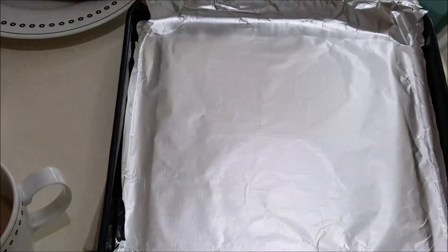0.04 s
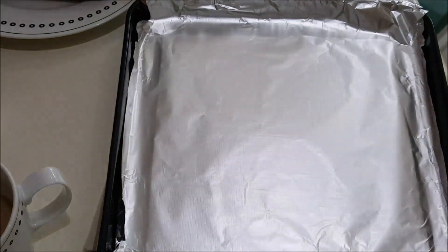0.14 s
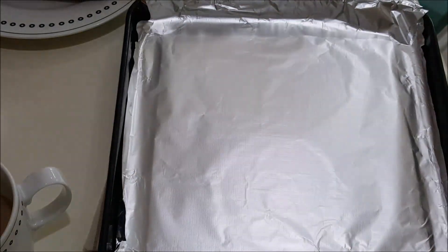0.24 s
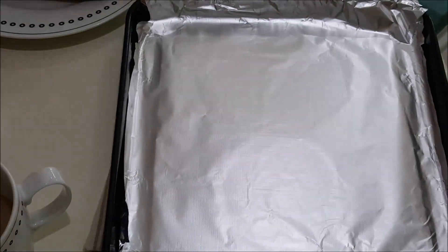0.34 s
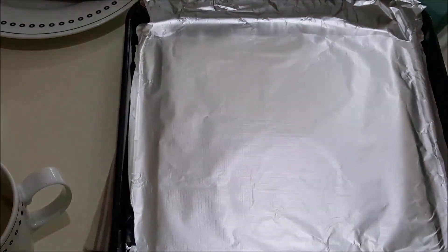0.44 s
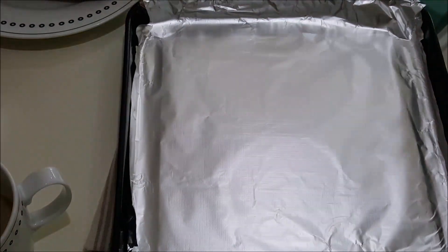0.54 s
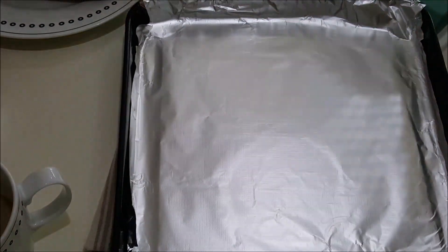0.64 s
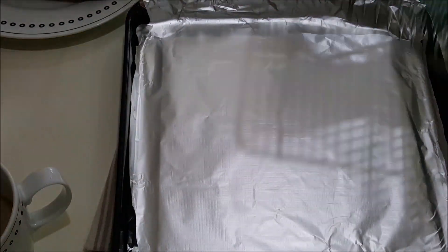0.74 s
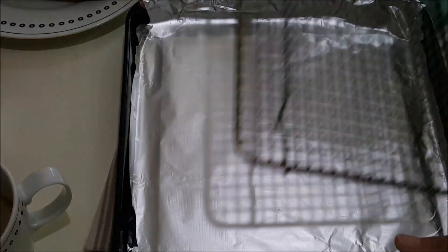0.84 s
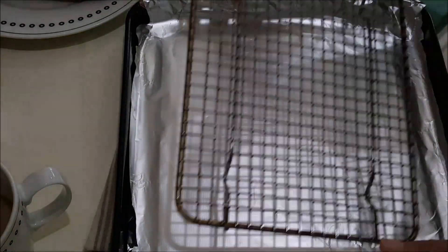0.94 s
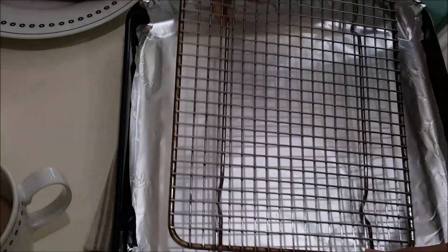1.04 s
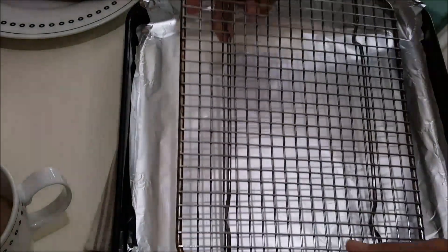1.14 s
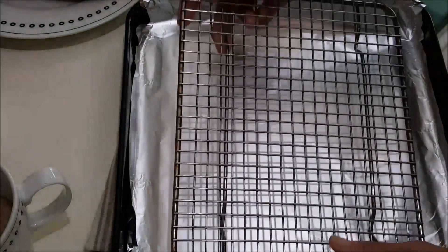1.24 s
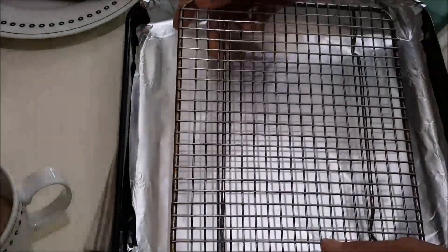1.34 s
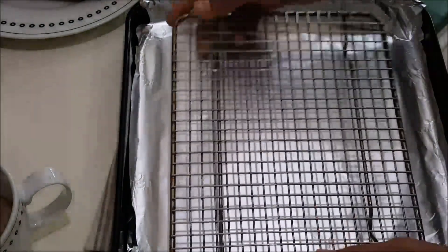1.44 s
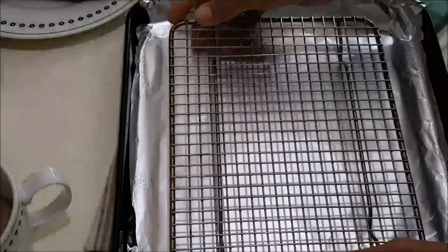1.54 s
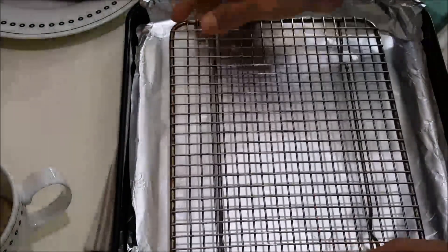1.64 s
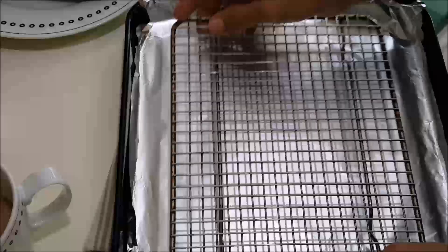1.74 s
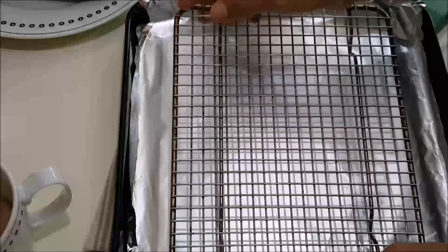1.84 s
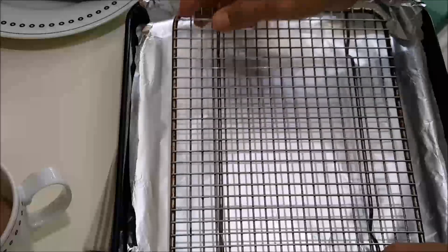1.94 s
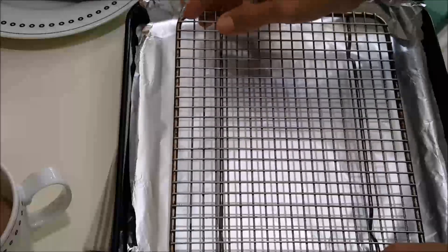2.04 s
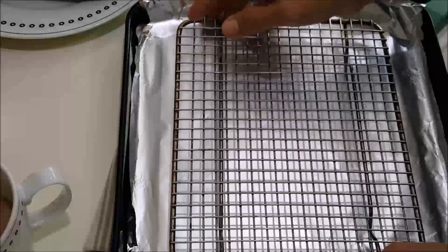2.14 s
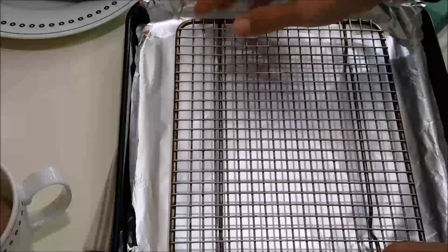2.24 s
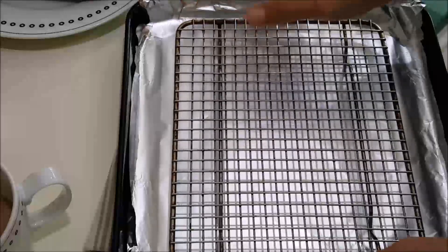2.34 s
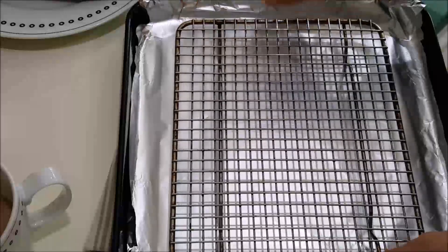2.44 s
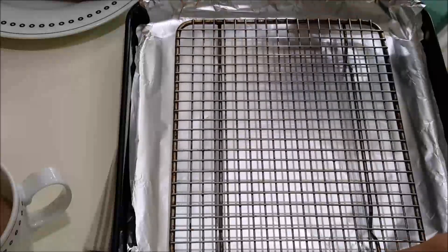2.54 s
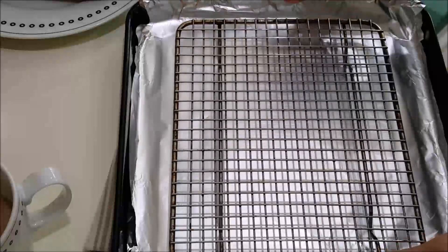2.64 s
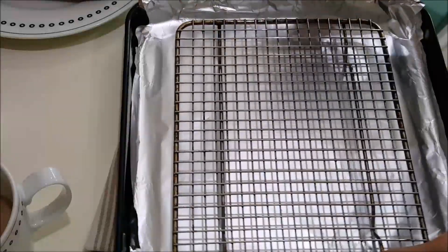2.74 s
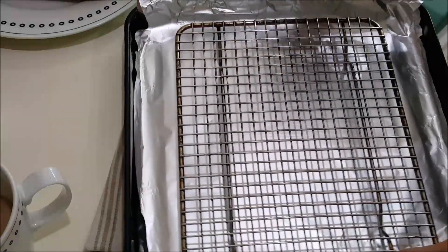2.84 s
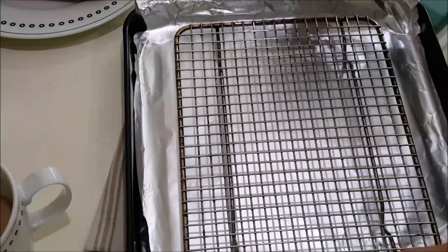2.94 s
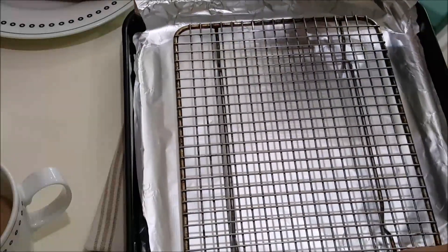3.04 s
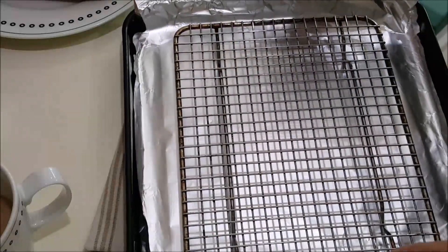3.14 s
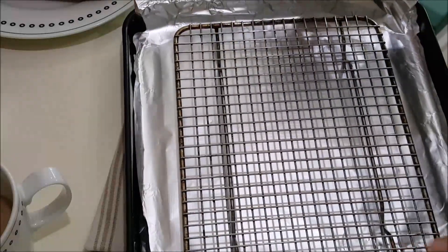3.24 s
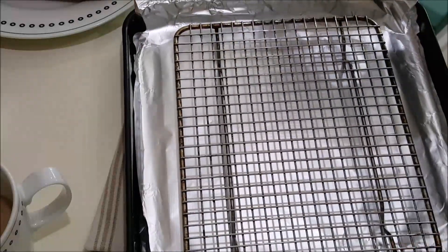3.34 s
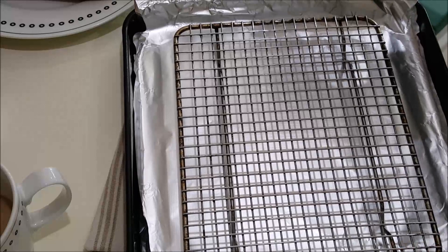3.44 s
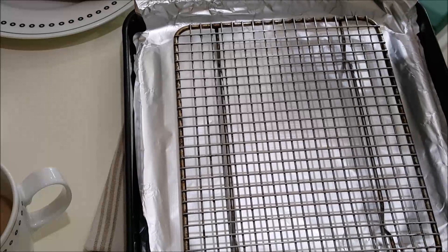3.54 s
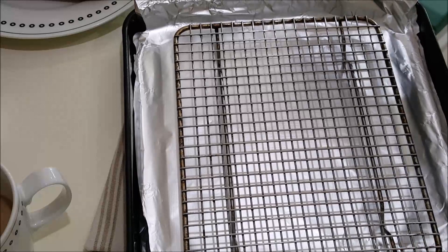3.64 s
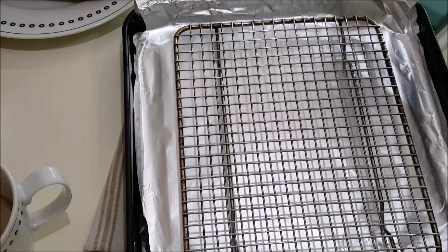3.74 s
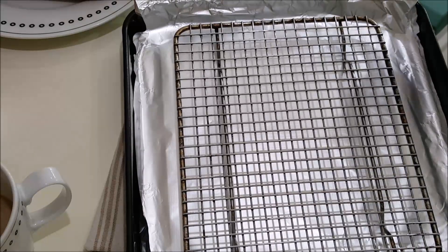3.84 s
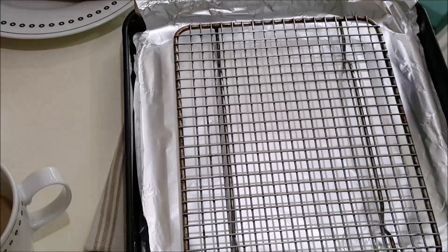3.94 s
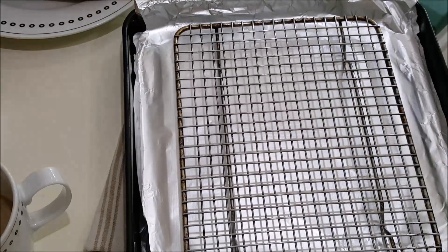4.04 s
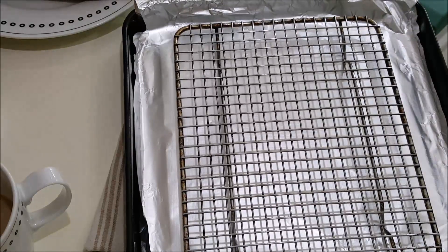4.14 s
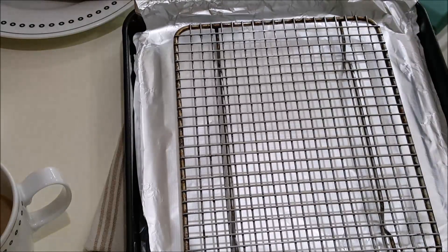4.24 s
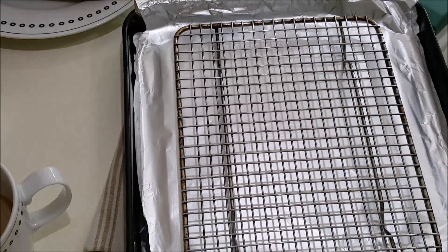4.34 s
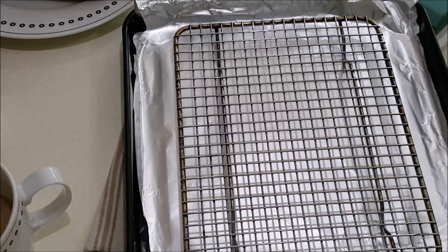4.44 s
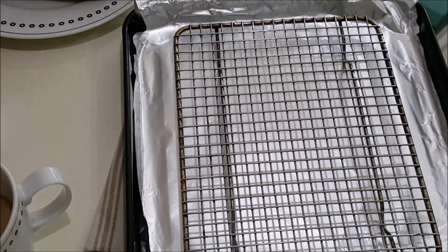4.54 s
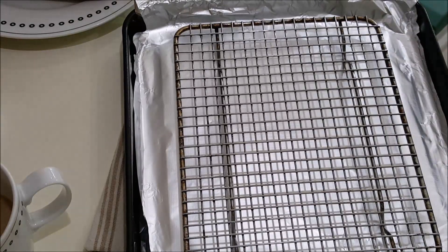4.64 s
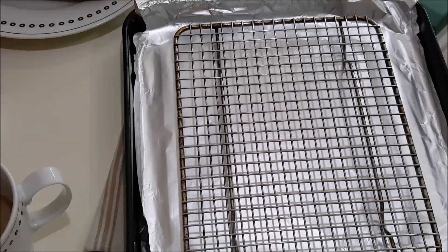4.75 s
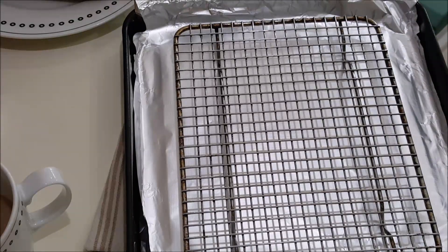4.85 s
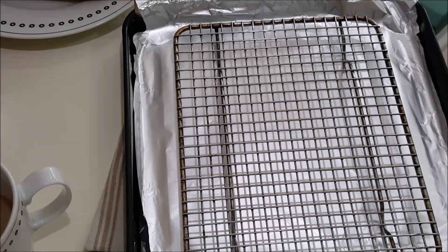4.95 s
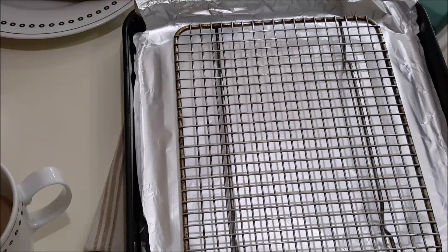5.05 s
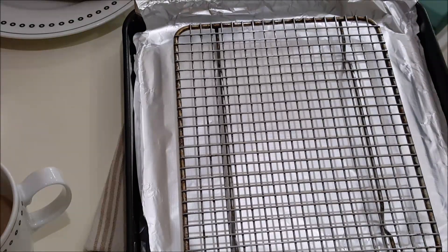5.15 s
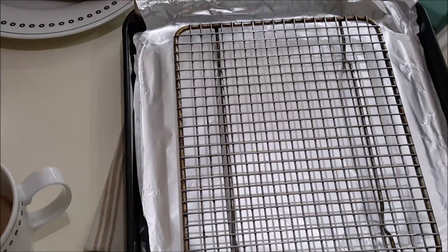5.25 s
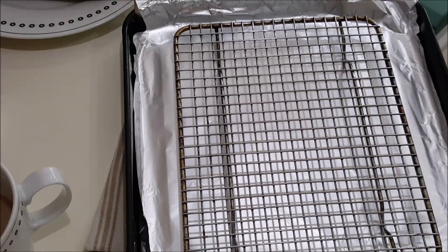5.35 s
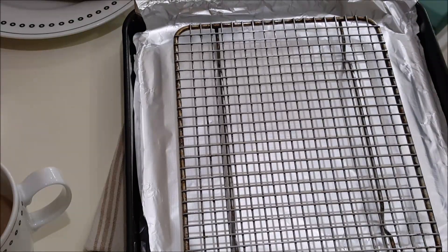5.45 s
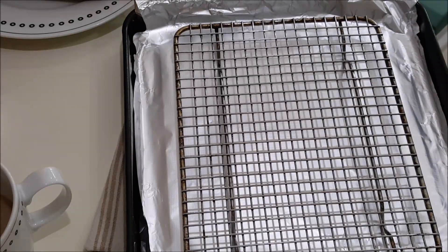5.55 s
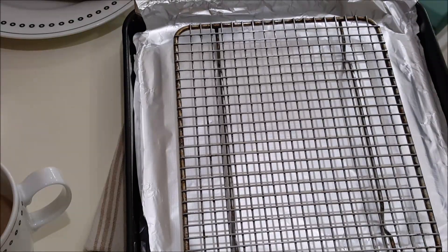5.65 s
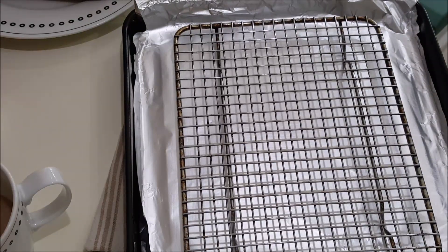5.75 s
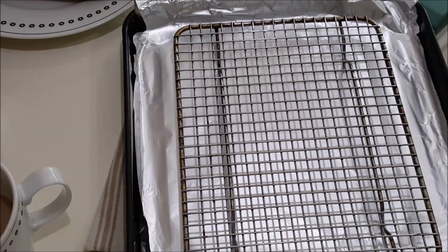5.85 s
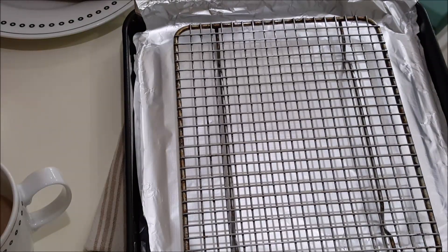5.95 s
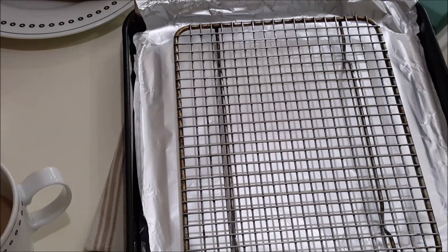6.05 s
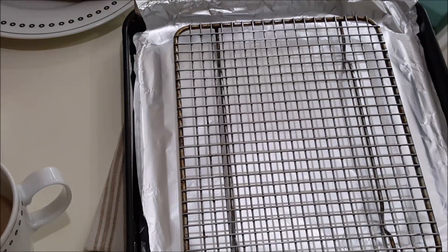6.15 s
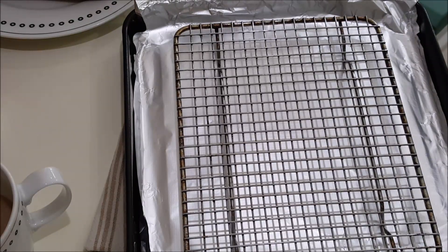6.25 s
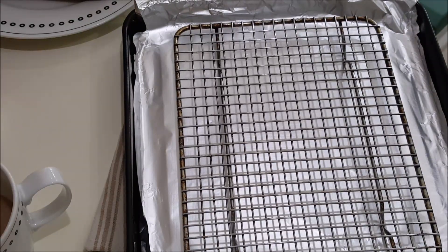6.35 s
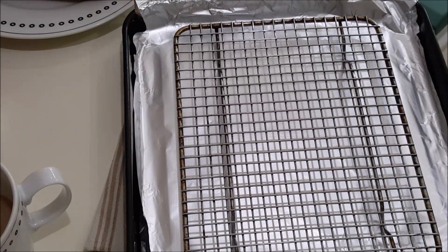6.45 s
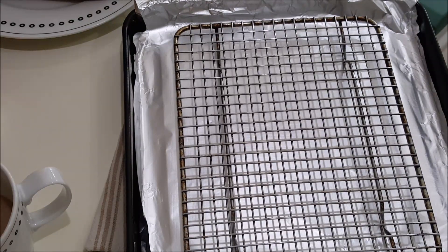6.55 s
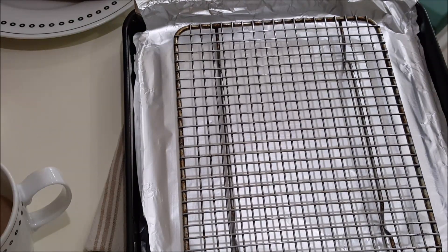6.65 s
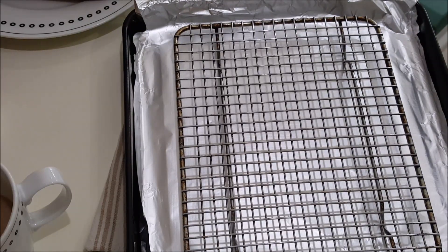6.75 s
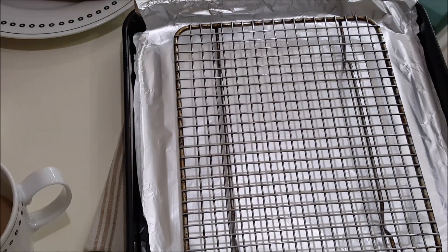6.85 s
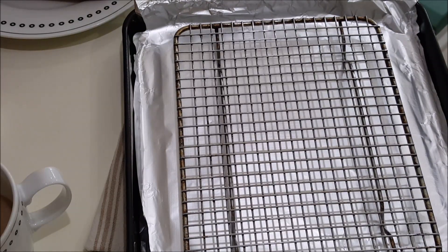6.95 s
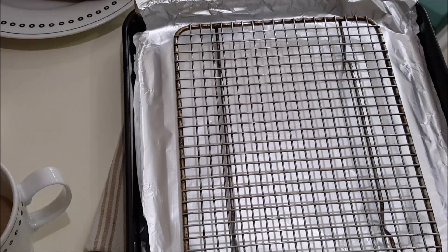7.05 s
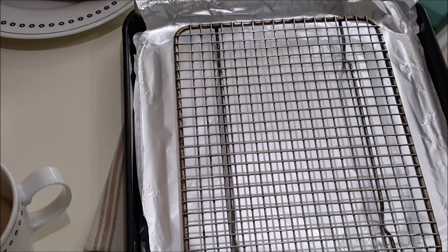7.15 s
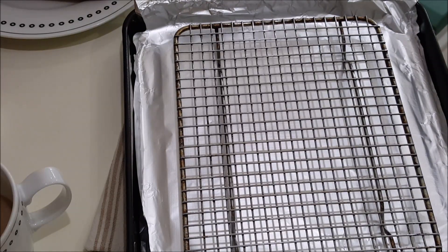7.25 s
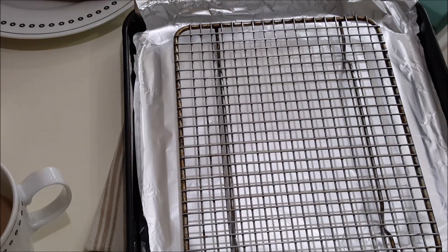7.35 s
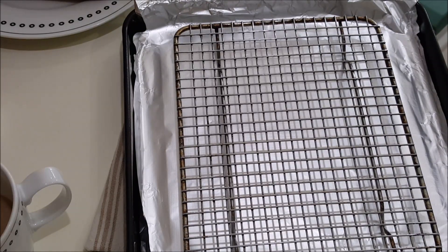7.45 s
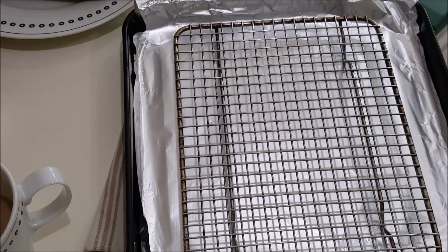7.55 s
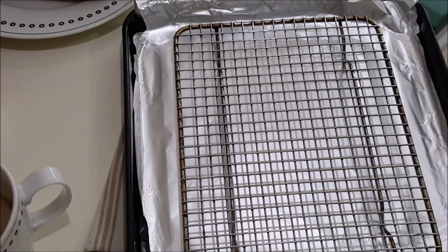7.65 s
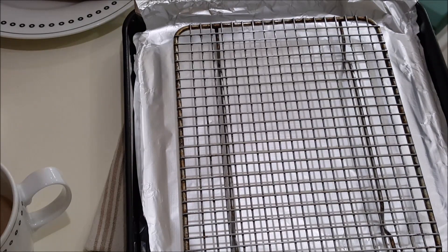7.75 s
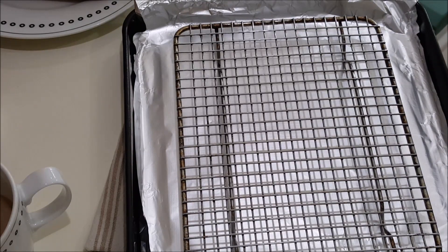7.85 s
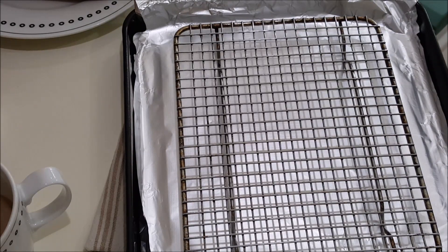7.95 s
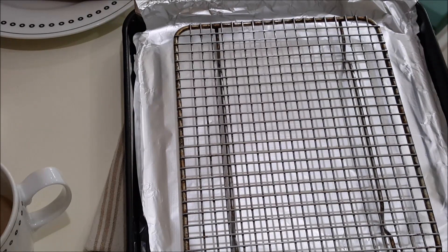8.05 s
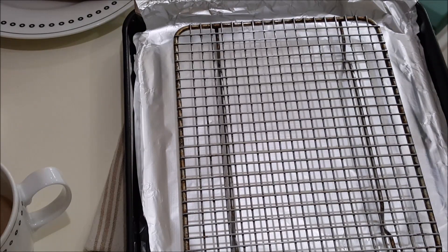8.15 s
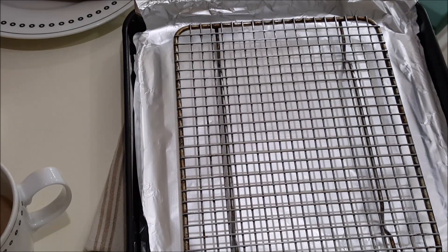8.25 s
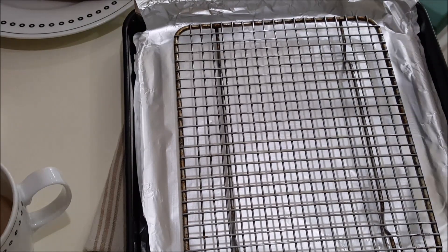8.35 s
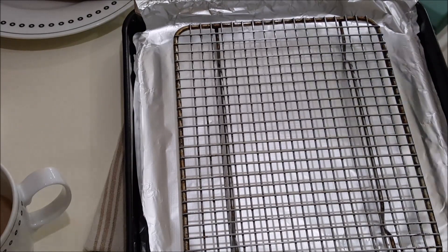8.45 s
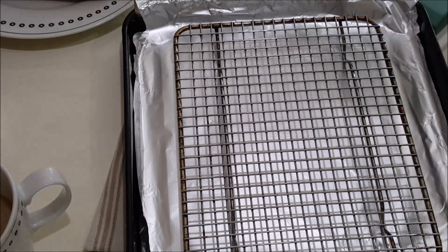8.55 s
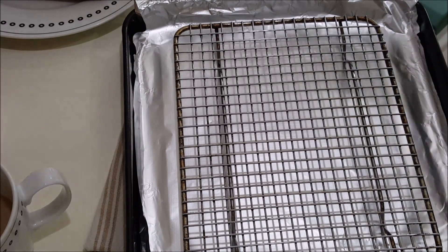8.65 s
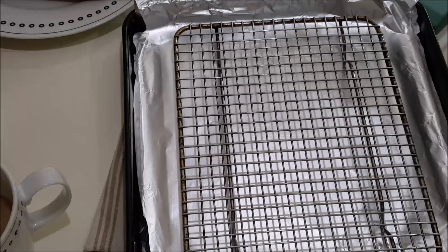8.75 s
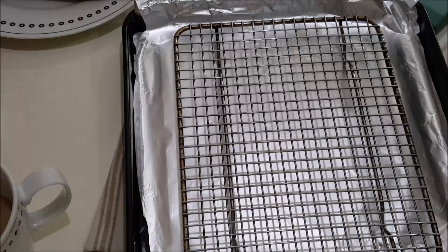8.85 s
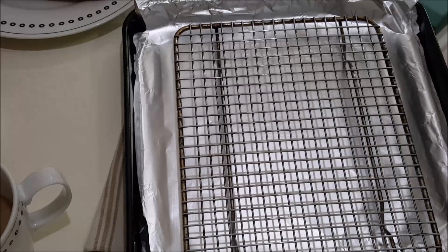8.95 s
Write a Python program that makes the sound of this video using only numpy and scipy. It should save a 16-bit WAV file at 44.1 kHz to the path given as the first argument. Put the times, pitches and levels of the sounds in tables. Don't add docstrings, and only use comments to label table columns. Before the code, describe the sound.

A small kitchen with hard, short-echoing walls and a faint low fridge hum, heard through a stereo phone near the tray. From 0 to 1 s hands stroke foil: light rustles, crisp ticks and a faint fading tray ring. At 1.07 s a wire rack's edge lands with a bright clank and foil crack; a stronger clank comes at 1.47, a ringing corner at 2.2, a soft nudge at 2.34. Foil crinkles crisply around 3.2, with dull small taps at 3.5 and a soft brush near 4.1. From 4.7 a drawer off to the side rolls open with a breathy squeak, bumpy boom and small chinks, fading by 6. Between 6.4 and 7.1 contents slide, utensils clink, and a lid knocks at 6.6. It rolls back from 7.4; a sharp loud latch snap at 7.82 leaves a thin ring, then wooden thuds at 8.33 and small brushes near 8.9.

```python
import sys
import numpy as np
from scipy import signal
from scipy.fft import rfft, irfft
from scipy.io import wavfile
from scipy.ndimage import uniform_filter1d

SR = 44100
rng = np.random.default_rng(int(sys.argv[2]) if len(sys.argv) > 2 else 0)


def put_to_file(sound):
    columns = np.atleast_2d(sound).T
    safe = np.clip(columns, -1, 1)
    whole_steps = np.round(safe * 32767)
    wavfile.write(sys.argv[1], SR, whole_steps.astype(np.int16))


def amplitude_ratio(level_db):
    exponent = np.asarray(level_db, float) / 20
    return 10 ** exponent


N = 396900

# (f/Hz, level/dB per Hz)
RUB = [(530, -15), (900, -8.5), (1040, -9), (1200, -3.5), (1410, -6.5), (2290, 1), (3070, -0.5),
       (7000, -15.5), (9100, -26), (15400, -120)]
# (f/Hz, level/dB per Hz)
HISS = [(2650, -34), (4500, -1.5), (6220, -1.5), (8690, 2.5), (9660, -8), (10800, -10), (12700, -7.5),
        (14800, -12), (16000, -7)]
# (full strength at t/s, hold/s, middle level/dB, treble level/dB)
STROKES = [(0.0, 0.001, -55, -60.5), (.075, 0.046, -64.5, -63.5), (.146, .001, -57, -56.5),
           (.375, .01, -64, -60.5), (.586, 0.059, -70, -66.5), (.828, .001, -49, -62.5),
           (1.12, 0.024, -53, -58), (1.22, 0.051, -61, -65), (1.43, .001, -70, -74),
           (1.56, 0.074, -67, -64.5), (1.69, 0.064, -70.5, -68), (1.79, 0.019, -64, -61.5),
           (2.19, 0.067, -65, -64), (2.38, 0.17, -62.5, -58.5), (2.56, 0.014, -67.5, -64.5),
           (2.72, .001, -71, -66.5), (2.775, .001, -73, -66.5), (2.84, 0.28, -81, -74),
           (3.01, 0.0011, -61.5, -63), (3.157, 0.004, -60.5, -51.5), (3.188, 0.011, -55, -48.5),
           (3.232, 0.0087, -60, -50.5), (3.268, .006, -69, -56.5), (3.305, 0.007, -75, -66.5),
           (3.375, 0.04, -57.5, -72), (3.45, .04, -61, -72), (3.58, .001, -65, -76), (3.842, .02, -69, -87),
           (3.896, .01, -61, -76), (3.96, 0.088, -70, -76.5), (4.122, .001, -50.5, -67),
           (4.138, 0.002, -49.5, -65.5), (4.37, .001, -64, -75)]
STROKE_RISE_DB_S, STROKE_FADE_DB_S = 866, (203, 157)
# (t/s, peak level/dB, chatter/s)
SNAP = [
    (7.8207, -17, 0.0021),
]


def colour(x, table):
    hz, db = np.transpose(table)
    bins_hz = np.arange(2049) * SR / 4096
    log_gain = np.interp(np.log(bins_hz + 1), np.log(hz), db) * np.log(10) / 20
    ceps = irfft(log_gain)
    ceps[1:2048] *= 2
    ceps[2049:] = 0
    taps = irfft(np.exp(rfft(ceps)))
    taps /= np.sqrt(np.sum(taps ** 2))
    taps = taps.reshape((1,) * (x.ndim - 1) + (-1,))
    return signal.oaconvolve(x, taps, axes=-1)[..., :x.shape[-1]]


def ring(x, modes, longest=0.33):
    out = np.zeros(len(x))
    heard = np.flatnonzero(np.abs(x) > 1e-6)
    span = slice(heard[0], heard[-1] + int(2 * longest * SR))
    for k, (hz, db, t60) in enumerate(modes):
        r = np.exp(-np.log(1000) / (min(t60, longest) * SR))
        w = 2 * np.pi * hz / SR
        mode = signal.lfilter([np.sin(w)], [1, -2 * r * np.cos(w), r * r], x[span])
        out[span] += (-1) ** k * amplitude_ratio(db) * mode
    return out


def body(x, peaks):
    probe = np.zeros(SR // 2)
    probe[0] = 1
    modes = [(hz, db + 20 * np.log10(width), np.log(1000) / np.pi / width) for hz, width, db in peaks]
    return ring(x, modes) / np.sqrt(np.sum(ring(probe, modes) ** 2))


def buzz(x, depth):
    flutter = uniform_filter1d(rng.standard_normal(N), SR // 150) * np.sqrt(SR / 150)
    return x * (1 + depth * flutter)


def grains(scatter_db, patchy_db=2.0):
    patch = uniform_filter1d(rng.standard_normal(N), SR // 70) * np.sqrt(SR / 70)
    size = np.minimum(rng.exponential(size=N), 5)
    x = rng.standard_normal(N) * amplitude_ratio(scatter_db * size + patchy_db * patch)
    return x / np.sqrt(np.mean(x ** 2))


def bursts(times, dbs, lengths):
    out, t = np.zeros(N + SR), np.arange(SR // 5) / SR
    for s, db, length in zip(times, dbs, lengths):
        start = int(s * SR)
        out[start:start + len(t)] += amplitude_ratio(db) * np.exp(-t / max(length, 1e-4))
    return out[:N]


def strikes(times, dbs, lengths, head):
    first = np.zeros(N)
    where = (np.asarray(times) * SR).astype(int)
    first[where] = amplitude_ratio(dbs) * head * np.sqrt(np.asarray(lengths) * SR / 2)
    return first + bursts(times, dbs, lengths) * np.sign(rng.standard_normal(N))


def pushes(rows):
    s, db, push = np.transpose(rows)
    push = np.maximum(push, 1e-4)
    return bursts(s, db - 20 * np.log10(push * SR), push)


def curve(rows):
    s, *cols = np.transpose(rows)
    return [amplitude_ratio(np.interp(np.arange(N) / SR, s, c, -140, -140)) for c in cols]


def swells(rows, rise_db_s, fade_db_s):
    t = np.arange(0, N / SR, .001)
    s, hold, *dbs = np.transpose(rows)[:, :, None]
    early, late = np.maximum(s - t, 0), np.maximum(t - s - hold, 0)
    gains = []
    for db, fade in zip(dbs, fade_db_s):
        strongest = np.max(db - rise_db_s * early - fade * late, axis=0)
        gains.append(amplitude_ratio(np.interp(np.arange(N) / SR, t, strongest)))
    return gains


def ports(mid, side):
    treble = signal.butter(1, 646, "high", fs=SR, output="sos")
    mid = mid - 0.18 * signal.sosfilt(treble, mid)
    side = 0.81 * signal.sosfilt(treble, side)
    return np.array([mid + side, mid - side])


def room(x, wet_db, pan_db, lag):
    # (f/Hz, t60/s, level/dB)
    walls = [(100, 0.37, 9.5), (230, 0.56, -7), (585, 0.61, 0.8), (1950, 0.57, -1.3), (5900, 0.42, -0.5),
             (14100, 0.4, -1.5)]
    wall_hz, wall_t60, wall_db = np.transpose(walls)
    t = np.arange(SR // 2) / SR
    tail = np.zeros((2, 2, len(t)))
    for hz in 90 * 2. ** np.arange(8):
        octave = signal.butter(2, [hz / np.sqrt(2), hz * np.sqrt(2)], "band", fs=SR, output="sos")
        t60 = np.interp(np.log(hz), np.log(wall_hz), wall_t60)
        db = np.interp(np.log(hz), np.log(wall_hz), wall_db)
        tail += signal.sosfilt(octave, rng.standard_normal(tail.shape)) * amplitude_ratio(db - 60 * t / t60)
    tail = signal.sosfilt(signal.butter(2, 250, "high", fs=SR, output="sos"), tail)
    tail *= (1 - np.exp(-t / 0.00011)) * (1 + 3.35 * np.exp(-t / 0.0043))
    tail = ports(*tail)
    tail *= amplitude_ratio(wet_db) / np.sqrt(np.sum(tail ** 2) / 2 / 2)
    wander_per_s = 2.7
    place = 2 * np.pi * wander_per_s * np.arange(N) / SR
    placed = x * np.array([[np.cos(place), np.sin(place)]])
    wet = signal.oaconvolve(placed, tail, axes=2)[..., :N].sum(axis=1)
    straight = [np.roll(x, lag), x]
    return (wet + straight) * amplitude_ratio(np.array([[pan_db], [-pan_db]]) / 2)


def kitchen():
    # (f/Hz, level/dB)
    lines = [(80.7, -63.5), (123.8, -87), (253.0, -81), (446.8, -75.5), (899.0, -90)]
    # (f/Hz, level/dB per Hz)
    air_tone = [(15, -19), (25, -22.5), (40, -16), (62, -31), (105, -5.5), (161, -14.5), (326, -11),
                (384, -14), (451, -11), (700, -17.5), (962, -24), (2280, -27.5), (8360, -41), (10400, -45),
                (16000, -42.5)]
    t = np.arange(N) / SR
    hum = 0
    for hz, db in lines:
        sway = uniform_filter1d(rng.standard_normal((2, N)), SR // 6, axis=1) * np.sqrt(SR / 6)
        cycles = hz * t + 2.2 * np.cumsum(sway[1]) / SR
        hum = hum + np.sqrt(2) * amplitude_ratio(db + .9 * sway[0]) * np.sin(2 * np.pi * cycles)
    air = ports(*colour(rng.standard_normal((2, N)), air_tone))
    air[0] = np.roll(air[0], shift=4)
    rumble = colour(rng.standard_normal((2, N)), [(15, 2), (35, -3), (70, -25), (16000, -120)])
    air += amplitude_ratio(-13.5) * rumble
    return (hum + amplitude_ratio(-65) * air) * amplitude_ratio(np.array([[.45], [-.45]]))


def tray():
    # (f/Hz, level/dB, t60/s)
    modes = [(138.6, -9, 0.56), (518, -7.5, 0.29), (660, -11, 0.48), (812, -11, 0.68), (1197, -5, 0.47),
             (1635, -10.5, 0.55), (2000, -5, 0.23)]
    knock = bursts([0], [-59], [0])
    return sum(buzz(ring(knock, [mode], 0.75), 1.0) for mode in modes)


def foil():
    # (full strength at t/s, hold/s, middle level/dB, treble level/dB)
    brushes = [(4.73, 0.15, -79, -62.5), (4.87, 0.0059, -55, -56), (4.96, .001, -54.5, -61),
               (5.05, 0.36, -70.5, -80.5), (5.34, 0.078, -63.5, -75), (5.45, .001, -80, -61),
               (5.53, .001, -57.5, -77), (5.86, .001, -69.5, -73), (6.4, .08, -73, -86),
               (6.495, 0.16, -57.5, -66), (6.61, 0.016, -52, -54.5), (6.786, 0.047, -61.5, -69.5),
               (6.93, 0.0089, -53, -62), (7.012, 0.0013, -56, -56.5), (7.196, 0.00089, -70.5, -75),
               (7.39, 0.61, -71.5, -79.5), (7.815, 0.12, -56.5, -54.5), (8.03, 0.12, -67.5, -68),
               (8.198, .001, -56.5, -60), (8.334, .001, -42, -50.5), (8.53, 0.015, -50.5, -61.5),
               (8.625, 0.0082, -51.5, -68), (8.78, 0.17, -73, -90), (8.95, .06, -58.5, -61)]
    stroked = swells(STROKES, STROKE_RISE_DB_S, STROKE_FADE_DB_S)
    brushed = swells(brushes, 893, (163, 179))
    rub, hiss = np.add(stroked, brushed)
    return amplitude_ratio(-3.5) * (colour(rub * grains(2.5), RUB) + colour(hiss * grains(4.4), HISS))


def crackle():
    per_s, level_db, decay_s = 69, -7.5, 0.00066
    rub, hiss = swells(STROKES, STROKE_RISE_DB_S, STROKE_FADE_DB_S)
    when, size = rng.random(N), rng.exponential(size=N)
    snaps = (when < per_s / SR) * amplitude_ratio(level_db + 4.5 * np.minimum(size, 3))
    snaps = signal.lfilter([1], [1, -np.exp(-1 / (decay_s * SR))], snaps) * rng.standard_normal(N)
    return colour(rub * snaps, RUB) + colour(hiss * snaps, HISS)


def ticks():
    # (t/s, treble peak/dB, middle peak/dB)
    creases = [(0.0324, -52.5, -72), (0.1363, -40, -57), (0.171, -50.5, -62), (0.244, -53.5, -61),
               (0.337, -53, -59), (0.3638, -45, -53), (0.386, -56, -59), (0.403, -59.5, -72),
               (0.494, -63, -80), (0.522, -62.5, -88), (0.586, -52.5, -62), (0.594, -65, -59),
               (1.3008, -53, -67), (1.4265, -52.5, -53), (1.5419, -47, -60), (1.6733, -54.5, -63),
               (1.778, -56, -66), (1.837, -43.5, -54.5), (2.3062, -49, -72), (2.1973, -46, -63),
               (2.768, -55, -55), (2.784, -50, -60), (2.908, -59, -69), (2.9583, -76, -78),
               (4.1165, -67, -65), (3.532, -59, -70), (3.5448, -57, -68)]
    # (t/s, treble peak/dB, middle peak/dB)
    cracks = [(1.072, -34.5, -31.5), (1.0851, -44, -49), (1.4724, -46, -38), (2.2027, -46.5, -48),
              (2.3416, -57, -73), (3.003, -69, -65), (3.532, -72, -66), (3.5445, -72, -67)]
    # (t/s, treble peak/dB, middle peak/dB)
    clicks = [(4.845, -62, -58), (4.8759, -66, -58), (4.9528, -70, -56), (5.3079, -77, -63),
              (5.378, -68, -70), (5.44, -53, -62), (5.5296, -81, -69), (5.623, -70, -80), (5.763, -75, -72),
              (5.822, -68, -64), (5.847, -69, -63), (6.4902, -63, -51), (6.601, -46, -55), (6.78, -62, -68),
              (6.8197, -63.5, -61), (6.8778, -76, -52.5), (6.91, -64, -50.5), (7.0103, -53.5, -55),
              (7.051, -62, -71), (8.182, -67, -59.5), (8.3195, -61, -58), (8.3255, -57, -52),
              (8.3318, -57, -44), (8.345, -62, -43), (8.5267, -65, -56), (8.6187, -70, -54),
              (8.937, -60.5, -59)]
    # (t/s, treble peak/dB, middle peak/dB)
    folds = [(0.096, -55.5, -63), (.625, -55, -61), (0.636, -54, -60), (.81, -70, -57), (.823, -71, -58),
             (2.392, -55, -61), (2.397, -52, -65), (2.471, -52.5, -59.5), (2.48, -58, -73),
             (2.6835, -65, -65.5), (3.1318, -68, -82), (3.1534, -47.5, -74), (3.157, -47, -71),
             (3.186, -46.5, -59), (3.3762, -70, -65), (3.36, -75, -65), (3.8411, -84, -70),
             (3.893, -78, -65), (3.902, -81, -65), (4.134, -66, -50), (4.364, -80, -66)]
    s, high_db, mid_db = np.transpose(creases + cracks + clicks + folds)
    counts = [len(creases), len(cracks), len(clicks), len(folds)]
    chatter_s = np.repeat([0.0046, 0.0092, 0.009, 0.0068], counts)
    middle = strikes(s, mid_db, chatter_s, .3)
    treble = strikes(s, high_db, chatter_s, .4)
    return amplitude_ratio(3.0) * colour(middle, RUB) + amplitude_ratio(2.0) * colour(treble, HISS)


def rack():
    # (t/s, peak level/dB, chatter/s)
    blows = [
        (1.0718, -30, 0.0028),
        (1.0749, -28, 0.011),
        (1.212, -43, 0.016),
        (1.472, -26.5, .006),
        (1.4826, -36, 0.014),
        (2.2025, -33, 0.0067),
        (2.214, -43, 0.016),
        (2.3412, -43.5, 0.023),
        (3.002, -48, 0.0044),
        (3.547, -56, 0.026),
    ]
    # (f/Hz, level/dB per Hz)
    clank = [(90, -16), (160, -4.5), (300, 2), (500, 3.5), (1200, 1.5), (2600, -3), (6000, -11.5),
             (13200, -28)]
    return -amplitude_ratio(-9.5) * colour(strikes(*np.transpose(blows), 0.55), clank)


def wires():
    # (f/Hz, level/dB, t60/s)
    edge = [(368, 0.5, 0.1), (581, -3, 0.13), (796, -4, 0.14), (900, -10, 0.15), (1280, 5.5, 0.04),
            (1405, -3, 0.07), (1730, -1, 0.085), (1930, 3.5, 0.096), (2050, -3, 0.073), (2305, -4, 0.17),
            (2540, 4, 0.05), (3120, 4.5, 0.094), (3430, 3, .05), (4090, 5, 0.055)]
    # (f/Hz, level/dB, t60/s)
    frame = [(112, -12, 0.14), (380, -1.5, 0.065), (606, -13.5, 0.2), (800, -5, 0.13), (1084, -4, 0.064),
             (1190, -9.5, 0.12), (1617, -11.5, 0.18), (1846, -12, 0.18), (2060, -4, 0.055),
             (2240, -12, .12), (2763, -8, 0.06), (3170, -1, 0.1), (4030, -8, 0.04), (490, -8.5, 0.074)]
    # (f/Hz, level/dB, t60/s)
    corner = [(135, -8, .15), (244, -3, 0.14), (410, -0.5, 0.18), (792, -1.5, 0.19), (1069, 1.5, 0.12),
              (1197, -3, 0.12), (1600, -6, 0.27), (2350, -13, 0.17), (2630, -3, 0.1), (3500, -4, 0.11),
              (4100, -17, .1), (4630, -20, .1)]
    # (f/Hz, level/dB, t60/s)
    padded = [(194, 1, 0.061), (525, -4.5, 0.084), (698, -1.5, 0.17), (960, 7.5, 0.046), (1240, 4.5, 0.047),
              (1422, 8.5, 0.033), (1890, 3, 0.037), (2420, -2, 0.076), (2880, -8, .05)]
    # (t/s, level/dB, push/s)
    edge_feet = [(1.0722, -39, 0.000088), (1.0755, -42, 0.00011), (1.0805, -53, .0002),
                 (1.0851, -52, 0.00023), (1.2125, -60, 0.00018), (1.228, -54.5, 0.00035)]
    frame_feet = [(1.472, -33, 0.000078), (1.4823, -36, 0.00023), (1.4975, -44, 0.00017),
                  (1.519, -50, 0.00034)]
    corner_feet = [(2.2027, -45.5, 0.000085), (2.213, -55, 0.00036), (2.222, -52, .0003),
                   (2.243, -56.5, 0.00028), (2.3411, -56, 0.00019), (3.003, -65, 0.00009)]
    padded_feet = [(3.5325, -54, 0.00013), (3.5455, -54.5, 0.00013), (3.5535, -55.5, 0.00055),
                   (3.575, -61, .001)]
    rattle_db, rattle_s = -33.5, 0.017
    taps = colour(rng.standard_normal(N), [(100, 4.0), (1500, -4.0), (8000, -4.5)])
    out = 0
    landings = ((edge_feet, edge), (frame_feet, frame), (corner_feet, corner), (padded_feet, padded))
    for feet, modes in landings:
        s, db, _ = np.transpose(feet)
        tapping = taps * bursts(s, db + rattle_db, rattle_s + 0 * s)
        out = out + ring(pushes(feet) + tapping, modes)
    return -buzz(out, 0.43)


def rollers():
    # (t/s, level/dB)
    opening = [(4.7, -70), (4.832, -45.5), (4.93, -41), (5.04, -45.5), (5.39, -46), (5.48, -49),
               (5.66, -56), (5.9, -59.5), (6.0, -72)]
    shutting = [(7.25, -67), (7.41, -62.5), (7.6, -47), (7.79, -43.5), (7.96, -39.5), (8.24, -51.5),
                (8.4, -39), (8.5, -60), (8.71, -73)]
    # (t/s, hold/s, boom level/dB, rattle level/dB)
    jolts = [(4.884, .001, -66, -47.5), (4.93, .001, -44, -65), (4.96, .01, -41, -52.5),
             (4.996, .001, -37, -52.5), (5.07, 0.0076, -39, -62), (5.12, .001, -45, -59),
             (5.188, .001, -41, -66), (5.222, .001, -62, -65), (5.285, 0.04, -45.5, -59),
             (5.37, 0.024, -46, -57.5), (5.449, 0.013, -74, -54.5), (5.59, 0.0051, -40, -60),
             (5.79, .001, -58, -65), (7.42, 0.029, -45.5, -85), (7.544, .001, -67, -92),
             (7.82, 0.031, -46, -48.5), (8.1, 0.11, -43.5, -89), (7.994, 0.0091, -49, -67),
             (8.365, 0.0028, -39, -44.5), (8.62, 0.074, -79, -64.5), (8.938, .07, -49, -57),
             (7.19, 0.026, -51, -80), (8.2, 0.032, -49, -73)]
    rattle_db, full_speed_db, steepness = -55.5, -43, 1
    speed = curve(opening)[0] + curve(shutting)[0]
    boom, rattle = swells(jolts, 700, (600, 294))
    return speed + boom, amplitude_ratio(rattle_db) * (speed / amplitude_ratio(full_speed_db)) ** steepness + rattle


def drawer():
    # (f/Hz, width/Hz, level/dB)
    cabinet = [(117.6, 28, 2.5), (132, 34, 0.5), (158.7, 38, -3.5), (242.4, 20, -8), (303, 79, -17)]
    # (f/Hz, width/Hz, level/dB)
    box_peaks = [(232, 17.7, 8), (442, 126, -9.5), (565, 30, -4.5), (132, 60, -6.5)]
    # (f/Hz, level/dB per Hz)
    runners = [(180, -24.5), (300, -1.5), (649, -9.5), (755, -8.5), (1060, -9.5), (1300, -8), (1710, -9),
               (2500, -16), (3250, -27.5), (5500, -120)]
    # (t/s, hold/s, box level/dB, rattle level/dB)
    slides = [(5.6, 0.0091, -48, -75), (7.88, 0.051, -45, -66), (6.39, .09, -63.5, -66),
              (6.5, .001, -42.5, -49.5), (6.53, 0.041, -44, -50), (6.6, 0.06, -43.5, -53),
              (6.74, 0.28, -56, -60), (6.9, 0.055, -44, -51), (7.019, 0.0022, -42.5, -48),
              (7.19, 0.015, -53, -66)]
    # (t/s, peak level/dB, push/s, loose rattle level/dB)
    knocks = [
        (6.5964, -26.5, 0.00059, -40),
        (7.014, -47, 0.00067, -45),
        (7.812, -26, 0.0022, -40.5),
        (8.325, -19, 0.00021, -37.5),
        (8.347, -20.5, 0.00043, -37),
        (8.337, -24.5, .0006, -39),
        (8.356, -26, 0.00054, -47),
    ]
    # (f/Hz, level/dB, t60/s)
    lid = [(250, 1, 0.13), (406, 16.5, 0.029), (514, 12, 0.034), (878, -4, 0.099)]
    # (f/Hz, level/dB, t60/s)
    panel = [(108, 2.5, 0.11), (207.4, -9, 0.26), (273, 1, 0.059), (335, -6, 0.11), (500, -7, 0.05),
             (907, -7, 0.064)]
    # (t/s, level/dB)
    squeak = [(4.7, -83), (4.73, -67), (4.79, -65), (4.81, -57), (4.84, -60), (4.89, -59), (4.95, -74),
              (5.0, -90)]
    # (f/Hz, width/Hz, level/dB)
    seal = [(11000, 1700, -4.5), (12900, 1700, 1), (14600, 2100, -1.5)]
    boom, rattle = rollers()
    box, clatter = swells(slides, 603, (256, 182))
    out = body(boom * grains(2.3), cabinet) + body(box * grains(3.6), box_peaks)
    out += colour((rattle + clatter) * grains(3.0), runners)
    for (s, db, push, loose_db), modes in zip(knocks, [lid] * 2 + [panel] * 5):
        out += ring(bursts([s], [db - 3.0], [push]) / (push * SR), modes)
        out += colour(strikes([s], [loose_db], [.025], 0.34), runners)
    out += body(curve(squeak)[0] * grains(2.8), seal)
    return amplitude_ratio(-4.5) * out


def chinks():
    # (t/s, peak level/dB, f/Hz, t60/s)
    bits = [(4.851, -53.5, 1600, 0.13), (4.877, -48.5, 1620, 0.096), (5.335, -57, 1780, 0.11),
            (5.449, -62, 2590, .1), (5.85, -61, 5100, 0.16), (6.597, -48, 6600, .12), (6.74, -64, 3250, .2),
            (6.785, -55, 4200, .07), (6.829, -54.5, 2600, 0.14), (6.877, -53, 3000, .07),
            (6.877, -57, 2060, .08), (6.877, -56, 4340, .04), (6.909, -52, 3030, .05),
            (6.912, -49, 3500, .05), (6.935, -52.5, 1500, 0.13), (7.0101, -49, 3650, .04),
            (7.0101, -44, 4880, .04), (7.0101, -45, 5700, 0.047), (7.013, -49.5, 534, 0.089),
            (7.029, -49, 486, .06), (7.047, -47, 550, 0.064), (7.059, -45, 490, 0.04)]
    return sum(ring(pushes([(s, db, 0)]), [(hz, 5.0, t60)]) for s, db, hz, t60 in bits)


def utensils():
    # (t/s, peak level/dB)
    clinks = [
        (6.4906, -48),
        (6.5005, -61),
        (6.511, -54),
        (6.529, -64),
        (6.596, -48.5),
        (7.01, -55),
    ]
    # (f/Hz, level/dB, t60/s)
    modes = [(2055, 3.5, 0.1), (2576, 1.5, 0.079), (3300, 3, 0.016), (4115, -3.5, 0.062), (4640, 1, 0.019)]
    s, db = np.transpose(clinks)
    return amplitude_ratio(-21.5) * buzz(ring(strikes(s, db, 0.0029 + 0 * s, 0.75), modes), 0.81)


def latch():
    # (f/Hz, level/dB per Hz)
    snap_tone = [(590, -34), (1800, -14), (2100, -6), (3940, -7.5), (5630, -7), (6780, -6.5), (8750, -10),
                 (10100, -13), (11700, -10.5), (16000, -22)]
    # (f/Hz, level/dB, t60/s)
    modes = [(2285, 0, 0.089), (2930, -3, 0.073), (3940, -6, .06), (4538, -12, .15), (5100, -10, .08),
             (5437, -6, .2), (6400, -3, 0.23), (6600, 0, 0.14), (7500, -12, 0.15), (8430, -8, .2),
             (8500, 0.5, 0.13), (11900, -9, .15)]
    s, db, chatter_s = np.transpose(SNAP)
    snap = amplitude_ratio(-3.5) * colour(strikes(s, db, chatter_s, 0.48), snap_tone)
    return snap + amplitude_ratio(-30) * buzz(ring(bursts(s, db, 0 * s), modes), .8)


def spring():
    # (f/Hz, level/dB, t60/s)
    mode = [(4764, -56, 1.1)]
    return ring(pushes([(SNAP[0][0], 0, 0)]), mode, 1.5)


def scene():
    turn_s = 4.6
    later = np.arange(N) / SR > turn_s
    rustle = foil()
    near = room(ticks() + crackle() + wires() + chinks(), -9, .4, lag=4)
    near += room(rustle * ~later, 0.16, 1.0, lag=4)
    near += room(rack(), 0.83, 2.6, lag=1) + tray()
    aside = room(drawer() + rustle * later, 0.26, 1.0, lag=12)
    aside += room(utensils() + latch(), 0, -.5, lag=12) + spring()
    low_cut = signal.butter(3, 74, "high", fs=SR, output="sos")
    return signal.sosfilt(low_cut, near + aside) + kitchen()


def roll_off(x):
    return signal.sosfilt(signal.butter(12, 15900, fs=SR, output="sos"), x)


def record(dry):
    top_cut = signal.ellip(12, .2, 70, 15950, fs=SR, output="sos")
    mix = signal.sosfilt(top_cut, dry)
    return roll_off(mix)


dry = scene()
out = record(dry)
put_to_file(out)
```